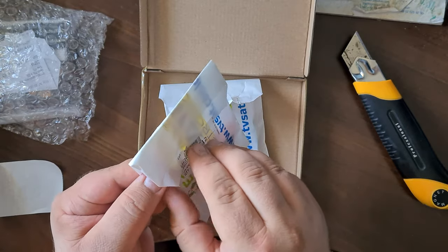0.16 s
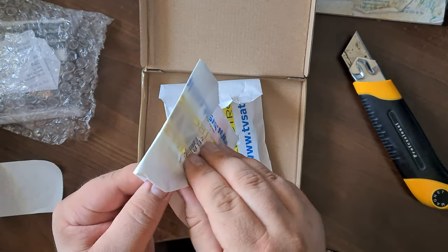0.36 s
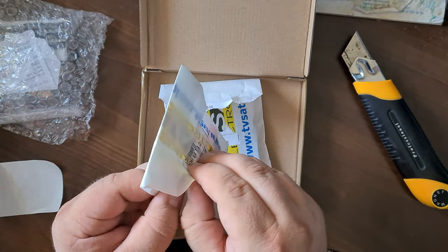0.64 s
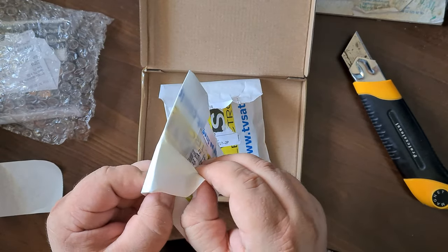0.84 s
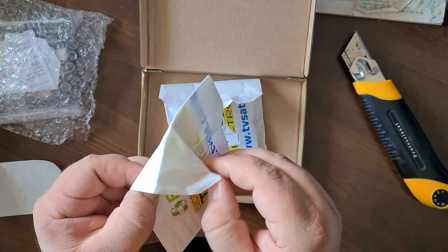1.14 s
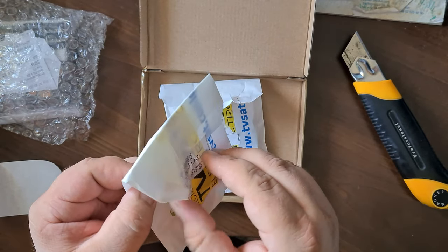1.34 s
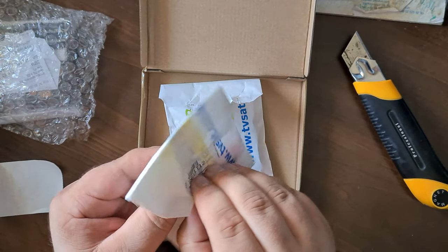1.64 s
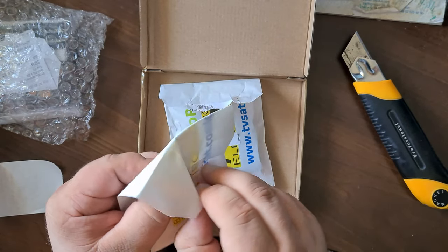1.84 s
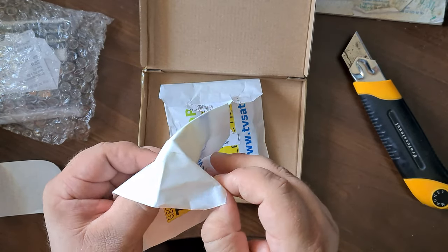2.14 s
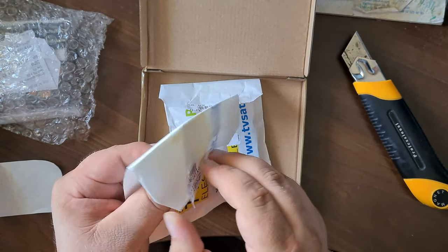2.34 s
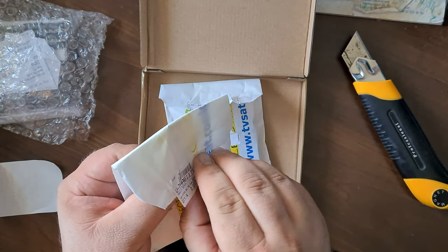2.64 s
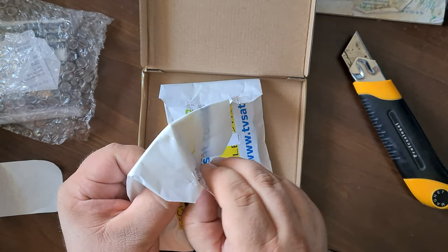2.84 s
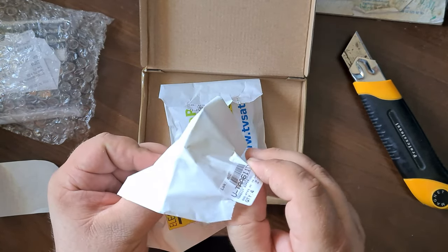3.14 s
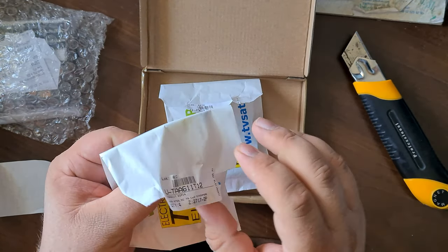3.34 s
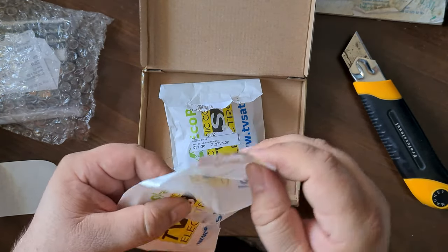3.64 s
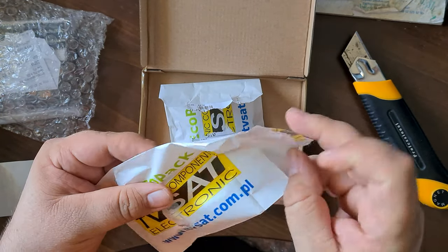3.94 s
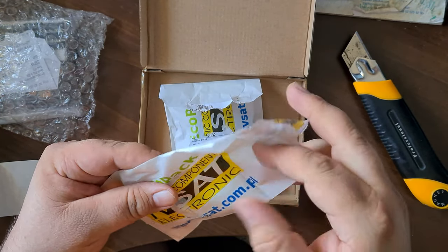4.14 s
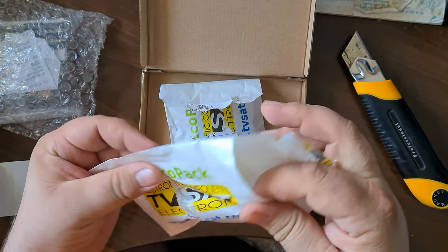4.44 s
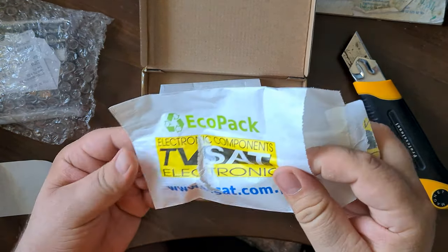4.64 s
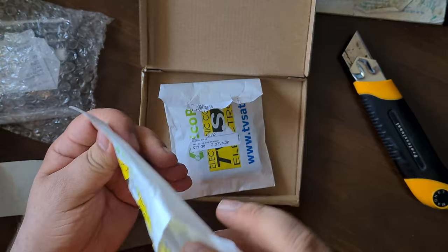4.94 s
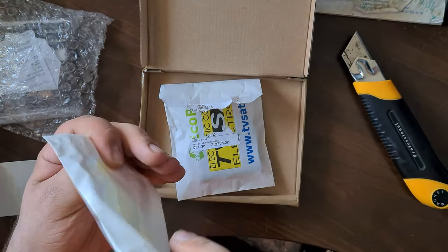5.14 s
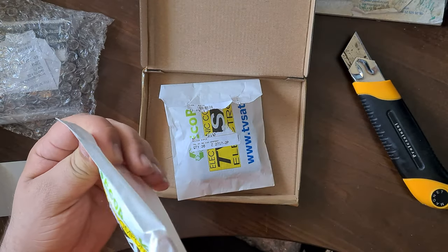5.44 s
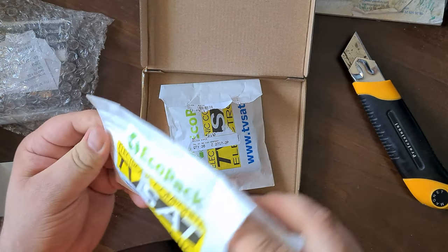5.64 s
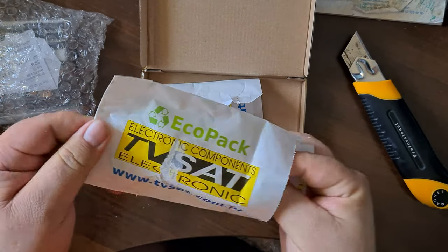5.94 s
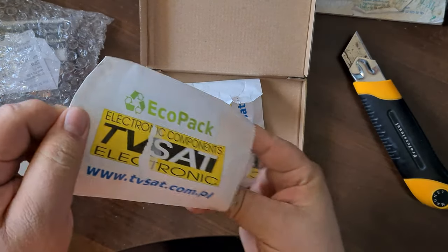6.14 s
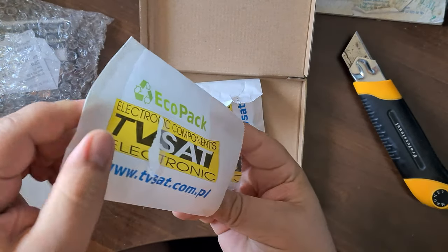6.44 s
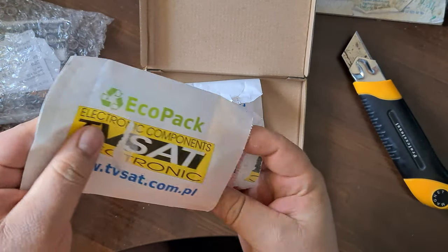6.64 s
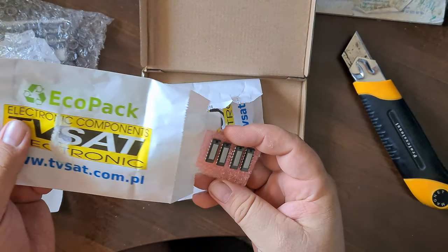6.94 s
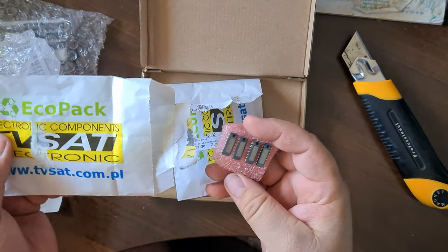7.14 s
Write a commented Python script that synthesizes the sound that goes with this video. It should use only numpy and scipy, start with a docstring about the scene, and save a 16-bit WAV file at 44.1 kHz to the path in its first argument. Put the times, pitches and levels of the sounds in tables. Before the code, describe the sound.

Close to the microphone in a quiet small room, hands work at a small stiff paper envelope over an open cardboard box. From 0 s come dry, irregular crackles and bright crease snaps, with a stronger snap at about 0.9 s running into a brief scrape. From 1 to 2.7 s the fingers rub and fold in uneven bursts, with another short scrape near 1.9 s. The rustle thickens, and at 3.0 s there is a sharp, quick double rip. Fuller crinkles follow, with dull panel pops at 3.9 and 4.35 s. Between 5.1 and 6.3 s the snaps are loudest and crispest, with a short tear at 5.2 s. A last scrape comes near 6.6 s, then the paper fades to sparse, faint ticks until about 7.2 s. Soft air noise, faint hum and swelling low rumble continue underneath.

```python
"""Opening a paper envelope over a box

Two hands work open a small paper envelope over a cardboard box on a desk, close to the microphone.
Creases buckle as dry volleys of noise with a ringing facet; sliding sheets crackle in tiny random slips.
Hard pulls rip in dense runs of slips, and panels pop over as dull puffs of low noise.
Box resonances and a short room tail colour the paper, over air noise, a faint hum and a low rumble."""
import sys
import numpy as np
from scipy import signal
from scipy.fft import rfft, irfft, next_fast_len
from scipy.io import wavfile
from scipy.ndimage import uniform_filter1d

SR = 44100
rng = np.random.default_rng(int(sys.argv[2]) if len(sys.argv) > 2 else 0)


def wav_out(sig):
    """Save sig, one row per channel (or a flat mono array), as 16-bit PCM at SR to the path in sys.argv[1]."""
    wavfile.write(sys.argv[1], SR, np.round(np.clip(np.atleast_2d(sig).T, -1, 1) * 32767).astype(np.int16))


N = 321489
TIME = np.arange(N) / SR

# Still air of the room. Each row: frequency in Hz, relative density in dB per Hz.
AIR_COLOUR = [(20, -32), (36, 0), (60, 2), (105, -0.5), (150, -4), (230, -6), (420, -1), (520, -7),
              (720, -2.5), (950, -9), (1300, -10), (2200, -16.5), (6000, -28), (16000, -43)]
# Steady hum of an appliance. Each row: frequency in Hz, level in dB before the left-right trim.
HUM_TONES = [(102.3, -68), (339.1, -64.5)]
# Low drones that come through the walls.
# Each row: centre in Hz, width in Hz, level in dB before the left-right trim.
LOW_DRONES = [(37, 11, -72.5), (60, 8, -77), (89, 59, -72)]
# The rumble swells and sinks. Each row: peak in seconds, rise in seconds, fall in seconds,
# centre in Hz, width in Hz, peak level in dB before the left-right trim.
RUMBLE_SWELLS = [(.1, .3, 0.59, 85, 35, -60.5), (1.12, 0.14, 0.12, 40, 22, -56),
                 (1.45, 0.7, 0.33, 85, 24, -59), (3.95, 0.75, .2, 60, 9.4, -58.5),
                 (4.1, .2, 0.47, 37, 11, -59), (5.25, 0.11, .2, 80, 24, -59),
                 (6.05, 0.22, 0.26, 37, 10, -62), (6.4, .15, 0.16, 84, 21, -59)]
# The fingers slide one sheet over another. Each row: start in seconds, length in seconds,
# level in dB before the crackle trim, body in dB, crispness in dB.
SLIDE_STROKES = [(0, 0.14, -36.5, 1, -7.5), (0.179, 0.092, -45, 1, -11), (0.329, 0.091, -43, -7, -6),
                 (.52, 0.042, -51, -8, -5), (0.583, 0.055, -43.5, -21, -5), (0.707, 0.3, -38, -10, -2.5),
                 (0.931, 0.091, -32.5, 7.5, -5), (1.067, 0.19, -42.5, -1, -5), (1.343, 0.042, -40, -1, -8),
                 (1.458, 0.069, -45.5, -5, -6.5), (1.605, 0.1, -50.5, -3, -4), (1.7, 0.14, -35.5, -5, -3.5),
                 (1.846, 0.077, -31.5, 1.5, -2), (1.97, 0.21, -39, 1, -8.5), (2.201, 0.054, -33, 0.5, -6),
                 (2.284, 0.37, -39.5, 2, -4.5), (2.691, 0.42, -31.5, -3, -4.5), (3.01, .06, -31, 0, -8),
                 (3.199, 0.015, -35, 6, -2), (3.304, 0.014, -34.5, 3.5, -4.5), (3.347, .06, -49, 6, -5),
                 (3.429, 0.3, -40.5, 6.5, -3.5), (3.688, 0.13, -32.5, 2.5, 0.5),
                 (3.907, 0.037, -36.5, 5.5, 3), (4.041, 0.082, -39, 3, -2.5), (4.187, .11, -42, 6.5, 5.5),
                 (4.316, 0.056, -29.5, 5, 0.5), (4.442, 0.03, -33.5, 2, -3.5),
                 (4.601, 0.024, -36.5, 7.5, -1.5), (4.704, 0.074, -36, 8, 1), (4.857, .15, -51, 8.5, -0.5),
                 (5.082, 0.036, -38.5, 3, -1.5), (5.151, 0.12, -27.5, 3, -1), (5.335, 0.11, -30, 3, -6),
                 (5.488, 0.073, -30.5, 0.5, -3.5), (5.655, 0.11, -37, 6, -3), (5.778, 0.11, -30, 1.5, -6.5),
                 (6.013, 0.079, -32, 2.5, -5), (6.229, 0.024, -32.5, 8, -2), (6.302, 0.022, -37.5, 2, -3),
                 (6.57, 0.042, -34, -3, -7), (6.666, 0.12, -41, 7.5, -4), (6.805, 0.27, -54, 11, -10)]
# A crease buckles. Each row: time in seconds, level in dB before panning, body in dB,
# crispness in dB, ring of the paper facet in Hz.
CREASE_SNAPS = [(.027, -33, -14, 1.5, 2035), (.0787, -32.5, 6, 6.5, 1900), (.1186, -31.5, -17, 1, 3300),
                (.1918, -31, 0.5, -4, 1930), (.2461, -34, 4, 0.5, 1890), (.3227, -45, 0, -1, 3160),
                (.3726, -37.5, -5, 0, 2090), (.4418, -43.5, -9, 7, 4690), (.6073, -31.5, -16, -5, 3420),
                (.6208, -47.5, -10, 17, 6350), (.6543, -34, -8, -2, 1940), (.7126, -32, -18, -8, 3230),
                (.8012, -30.5, -11, 4.5, 4940), (.8152, -35.5, -15, -14, 3540), (.8717, -19, -6, -3, 2820),
                (.938, -27.5, -18, 1, 1930), (1.0685, -29, 7, 9.5, 4700), (1.2115, -28.5, -6.5, 2.5, 4380),
                (1.3198, -33, -19, -9, 5960), (1.3857, -32.5, 2, 2, 1823), (1.4268, -38, -24, -9, 3380),
                (1.502, -36, 8, -1, 2846), (1.569, -39.5, -2, -1.5, 5360), (1.6517, -32.5, -11, -9, 3155),
                (1.7286, -27, 2, -1.5, 2970), (1.7916, -30.5, 3, -4, 3800), (1.8379, -31.5, 3, 6, 4960),
                (2.005, -28.5, -33, 0.5, 1970), (2.0471, -28.5, -7, -13, 1630),
                (2.2278, -28.5, 9, 3.5, 1970), (2.3583, -27, 3, 2.5, 5900), (2.4467, -31, 3, 7.5, 4700),
                (2.4626, -29, -3, -1, 6330), (2.5079, -31.5, -20, -1, 1970), (2.5814, -30.5, -15, 1, 3600),
                (2.6152, -27, -10, -1.5, 3360), (2.6941, -32, 1, -3, 1540), (2.742, -30.5, 3, 0, 1840),
                (2.8149, -31, 2.5, 2, 1846), (2.856, -27, 3, -5, 1780), (2.9373, -27, -2, -19, 2640),
                (3.0055, -27, -5, -19, 2040), (3.1883, -34.5, 10, 1, 2150), (3.2096, -36.5, -10, 4, 1880),
                (3.2312, -29.5, 2, -8.5, 1940), (3.2933, -34, 3, -3, 6000), (3.3834, -40.5, 8, 7, 3372),
                (3.4661, -36.5, 13, -12, 2130), (3.5074, -36, 10, 4, 1300), (3.6008, -28.5, -4, 6.5, 3030),
                (3.64, -29, 6.5, 5, 3260), (3.7624, -28, 7, 7, 4590), (3.807, -26, -19, -6, 3400),
                (3.9, -29.5, 13.5, 3.5, 1514), (4.0185, -37, -5, 4, 5040), (4.072, -31, -5, 3, 4040),
                (4.1406, -38, -5, -7, 4400), (4.1888, -29, 4, -7, 4530), (4.2167, -33.5, -8, -4, 1940),
                (4.3245, -28, 10.5, 10, 5716), (4.396, -29.5, 2, 1, 3380), (4.4597, -30, -20, 3, 6100),
                (4.4885, -26, 5, -10, 3280), (4.5965, -26, -6.5, -2.5, 6060), (4.62, -31, 3, -4, 3360),
                (4.7331, -34.5, 10, 11.5, 4230), (4.8563, -38, -20, 9.5, 5670), (4.904, -34, 6, -0.5, 3320),
                (4.9785, -39, -8, -1, 3320), (5.0966, -28.5, -6, -3, 4236), (5.1076, -25, 6.5, -2.5, 4400),
                (5.1517, -32, 1, 7, 1310), (5.165, -28, -8, 5, 1310), (5.2209, -27, 10.5, 7, 2000),
                (5.3816, -31, -1, 0.5, 4940), (5.4845, -28.5, -7, 0, 6360), (5.516, -22.5, 4.5, 0.5, 2862),
                (5.6011, -21.5, 0.5, -7, 2710), (5.813, -26, -15, -1, 2105),
                (5.9588, -22.5, 6.5, -15, 2600), (6.0026, -31.5, -13, -1, 2350),
                (6.0247, -23.5, -26, -6.5, 2940), (6.0563, -29, 7.5, 2, 1470),
                (6.175, -27.5, 10, -7.5, 2770), (6.2424, -24, -17.5, -2, 3913), (6.4395, -40.5, 4, 1, 2600),
                (6.5149, -32, 0, -2.5, 4050), (6.7513, -30.5, -5, 0.5, 4750), (6.851, -41.5, 5, -1, 6100),
                (7.016, -44, 0, -1, 5800), (7.0541, -45, -12, -14, 3430), (7.1168, -37, 5, 0, 1790)]
# A hard pull rips or scrapes the paper.
# Each row: start in seconds, end in seconds, level in dB, body in dB, crispness in dB.
HARD_PULLS = [(0.939, 1.005, -31.5, -1, -2), (1.864, 1.902, -29.5, 0.5, 2.5), (2.999, 3.058, -22, -7, -6),
              (3.043, 3.08, -19.5, 3, -1), (4.342, 4.362, -28.5, 4.5, 8), (5.223, 5.249, -23.5, 2, -4),
              (6.588, 6.623, -28, -1, -4.5)]
# A whole panel of the envelope pops over. Each row: time in seconds, peak level in dB before the box and room.
PANEL_FLOPS = [(1.028, -43), (3.061, -45), (3.9, -32), (4.35, -38), (5.225, -46), (6.025, -46)]
# Colour of a snap. Each row: frequency in Hz, relative density in dB per Hz.
SNAP_SPECTRUM = [(100, -43.5), (250, -15), (450, -14.5), (800, -10.5), (1300, -3), (2000, -4.5),
                 (2900, -0.5), (4200, -1), (6200, -1), (7500, -6), (8800, -11.5), (11000, -10.5),
                 (12400, -8), (16000, -12.5)]
# Colour of sliding and ripping paper. Each row: frequency in Hz, relative density in dB per Hz.
RUB_SPECTRUM = [(100, -27), (250, -21.5), (450, -11.5), (800, -7.5), (1300, -4), (2000, -3), (2900, -0.5),
                (4200, -2.5), (6200, -2.5), (7500, -6), (8800, -13), (11000, -12.5), (12400, -7),
                (16000, -14)]
# How much of the body each frequency takes. Each row: frequency in Hz, share from 0 to 1.
BODY_WEIGHT = [(850, 1), (1600, 0)]
# How much of the crispness each frequency takes. Each row: frequency in Hz, share from 0 to 1.
CRISP_WEIGHT = [(2700, 0), (5600, .55), (11000, 1)]
# Resonances of the pouch and the open box under it. Each row: centre in Hz, width in Hz, lift in dB.
HOLLOW_MODES = [(1308, 46, 8), (1894, 210, 5.5), (2067, 20, 8), (2880, 130, 1), (3183, 30, 5.5),
                (4020, 53, 2)]
# Decay of the room. Each row: frequency in Hz, time to fall 60 dB in seconds.
ROOM_DECAY = [(250, 0.45), (700, 0.32), (1800, 0.17), (4500, 0.36), (12000, 0.1)]
# Likeness of the two channels. Each row: frequency in Hz, likeness from 0 to 1.
CHANNEL_LIKENESS = [(100, 0.85), (550, 0.83), (1650, 0.66), (3000, 0.95), (5000, 0.45), (15000, 0.1)]
# Tonal balance between the channels. Each row: frequency in Hz, left minus right in dB.
LEFT_BALANCE = [(1000, 0), (4000, 1.8), (8000, -1.5), (12000, 3)]

# A stroke takes hold, lets go, and leaves the sheets creeping faintly.
GRIP_S, RELEASE_S, CREEP_DB, CREEP_S = 0.0042, 0.02, -8, 0.098
SLIP_S = .0009  # power decay of one tiny slip of the crackle
EDGE_HZ = 16050  # top of the recorder's band


def amp(db):
    """Decibels to gain."""
    return 10 ** (np.asarray(db) / 20)


def unit(x):
    """Scales to an rms of one."""
    return x / np.sqrt(np.mean(abs(x) ** 2) + 1e-20)


def read(points, hz):
    """Reads a table over log frequency."""
    f, value = np.transpose(points)
    return np.interp(np.log(hz + 1), np.log(f + 1), value)


def add(mix, s, sound):
    """Adds a stereo sound at time s."""
    part = mix[:, max(round(s * SR), 0):][:, :sound.shape[1]]
    part += sound[:, :part.shape[1]]


def causal(gain):
    """Gives a gain curve the phase of a thing that rings only after it is struck (minimum phase)."""
    log_gain = np.log(np.maximum(gain, 1e-5))
    circle = np.concatenate([log_gain, log_gain[..., -2:0:-1]], -1)
    return np.exp(np.conj(signal.hilbert(circle)))[..., :gain.shape[-1]]


def pair(a, b, hz, lead_s):
    """Blends two unrelated spectra into left and right, with the right ahead by lead_s."""
    same = np.clip(read(CHANNEL_LIKENESS, hz), 0, 1)
    balance = amp(read(LEFT_BALANCE, hz) / 2)
    shared, own = np.sqrt((1 + same) / 2), np.sqrt((1 - same) / 2)
    left = (shared * a + own * b) * balance * np.exp(-2j * np.pi * hz * lead_s)
    right = (shared * a - own * b) / balance
    return np.array([left, right])


def tilt_db(hz, body_db, crisp_db):
    """Large loose panels add body; tight small creases add treble."""
    return body_db * read(BODY_WEIGHT, hz) + crisp_db * read(CRISP_WEIGHT, hz)


def slip_power(length, per_s, spread_db, slip_s):
    """Power of a random train of fibre slips of unequal size, each dying away over slip_s; mean one."""
    sizes = amp(spread_db * np.minimum(rng.exponential(1, length), 4))
    slips = sizes * (rng.random(length) < per_s / SR)
    power = signal.lfilter([1], [1, -np.exp(-1 / (slip_s * SR))], slips ** 2)
    return power / (power.mean() + 1e-12)


def background(air_db=-56.0):
    """Room air as coloured noise, a steady hum of sine tones, and the low rumble."""
    hz = np.fft.rfftfreq(N, 1 / SR)
    noise = pair(*rfft(rng.standard_normal((2, N))), hz, 0)
    air = unit(irfft(noise * amp(read(AIR_COLOUR, hz)), N))
    hum = sum(amp(db) * np.sqrt(2) * np.sin(2 * np.pi * (f * TIME + rng.random())) for f, db in HUM_TONES)
    return amp(air_db) * air + hum + rumble()


def rumble():
    """Steady low drones, and swells that rise and sink as bells."""
    out = sum(amp(db) * drone(hz, width) for hz, width, db in LOW_DRONES)
    for s, rise_s, fall_s, hz, width, db in RUMBLE_SWELLS:
        bell = np.exp(-((TIME - s) / np.where(TIME < s, rise_s, fall_s)) ** 2)
        out = out + amp(db) * bell * drone(hz, width)
    return out


def drone(centre_hz, width_hz):
    """A narrow band of low noise, held at an even level of one."""
    size = next_fast_len(N)
    hz = np.fft.rfftfreq(size, 1 / SR)
    band_gain = 1 / (1 + (2 * (hz - centre_hz) / width_hz) ** 4)
    band = irfft(rfft(rng.standard_normal(size)) * band_gain, size)[:N]
    return band / np.sqrt(uniform_filter1d(band ** 2, size=12000))


def pull():
    """Level, body and crispness (dB) of the sliding paper over time; stronger strokes weigh more in the colour."""
    t = TIME[::40]  # hands move slowly enough for a coarse grid
    start, length, db, body_db, crisp_db = np.transpose(SLIDE_STROKES)[:, :, None]
    age = np.maximum(t - start, 0)
    after = np.maximum(age - length, 0)
    grip = 1 - np.exp(-age / GRIP_S)
    release = np.exp(-after / RELEASE_S) + amp(CREEP_DB) * np.exp(-after / CREEP_S)
    release = release / (1 + amp(CREEP_DB))
    power = (amp(db) * grip * release) ** 2
    total = power.sum(0) + 1e-9
    level = 10 * np.log10(total)
    body, crisp = (power * body_db).sum(0) / total, (power * crisp_db).sum(0) / total
    return [np.interp(TIME, t, curve) for curve in (level, body, crisp)]


def crackle(effort, level_db=-1, slips_per_s=700, spread_db=2.5, hiss_db=-11, patch_db=4.0,
            left_db=0.0, lead_s=.00007):
    """Fibres catch and let go in tiny slips of very unequal size, over the hiss of sheet on sheet."""
    db, body_db, crisp_db = effort
    power = slip_power(N, slips_per_s, spread_db, SLIP_S) + amp(hiss_db) ** 2
    power /= uniform_filter1d(power, size=1300)  # the pull of the hands sets the power that the slips share
    grains = rng.standard_normal((2, N)) * np.sqrt(power)

    padded = next_fast_len(N + 4096) * 2
    hz = np.fft.rfftfreq(padded, 1 / SR)
    colour = causal(unit(amp(read(RUB_SPECTRUM, hz))))
    grains = irfft(pair(*rfft(grains, padded), hz, lead_s) * colour)[:, :N]

    hz, t, z = signal.stft(grains, SR, nperseg=256, noverlap=192)
    # the facets keep changing shape, so their resonances come and go
    patches = uniform_filter1d(rng.standard_normal(z.shape[1:]), size=3, axis=0)
    patches = unit(uniform_filter1d(patches, size=12, axis=1))
    tilt = amp(tilt_db(hz[:, None], np.interp(t, TIME, body_db), np.interp(t, TIME, crisp_db)))
    z = z * tilt * unit(amp(patch_db * patches))
    grains = signal.istft(z, SR, nperseg=256, noverlap=192)[1][:, :N]
    return grains * amp(db + level_db + np.array([[left_db], [-left_db]]))


def snaps(rows, level_db=0, rise_s=.0004, volley_s=.0033, stretch=.12, settle_s=0.019, settle_db=-22,
          desk_s=0.007, desk_db=-18, desk_spread_s=0.0055, ring_s=0.0023, lead_s=.00007,
          left_db=-0.1, wander_db=2.0, size=2048):
    """Each buckle is a quick volley of fibre slips that rings one facet; the desk returns it and the sheet settles."""
    out, t, hz = np.zeros((2, N)), np.arange(size) / SR, np.fft.rfftfreq(size, 1 / SR)
    span = np.sqrt(.006 * SR)  # levels are rms over 6 ms
    for s, db, body_db, crisp_db, ring_hz in rows:
        # where on the envelope the crease lies: scales the desk delay and the lead of the right
        height, side = rng.uniform(1.0, 1.9), rng.uniform(0.14, 1.53)
        pan_db = left_db + wander_db * rng.uniform(-1, 1)

        burst_s = volley_s * amp(stretch * body_db)  # a larger panel takes longer to give
        onset = 1 - np.exp(-t / rise_s)
        settle = amp(settle_db) * np.exp(-t / settle_s)
        volley = onset * (np.exp(-t / max(burst_s, rise_s)) + settle)
        volley += amp(desk_db) * np.exp(-abs(t - desk_s * height) / desk_spread_s)
        slips = rng.standard_normal((2, size)) * np.sqrt(rng.exponential(1, size)) * volley
        # the crease gives with one marked slip at the peak
        slips[:, np.argmax(volley)] = amp(-9) * np.linalg.norm(volley) * rng.choice([-1, 1], 2)

        z = pair(*rfft(slips), hz, lead_s * side)
        # a slip is broadband: flatten its broad shape and keep only the fine ripple
        broad = np.sqrt(uniform_filter1d(abs(z) ** 2, size=120, axis=1).mean(0))
        colour = unit(amp(read(SNAP_SPECTRUM, hz))) * amp(tilt_db(hz, body_db, crisp_db))
        crack = irfft(z * causal(colour / broad))

        # the facet swings for a few cycles; duller snaps ring more
        swing = np.sin(2 * np.pi * ring_hz * (t - np.array([[lead_s * side], [0]])))
        ring = unit(swing * onset * np.exp(-t / ring_s)) / np.sqrt(size)
        ring_gain = amp(-8 - .5 * crisp_db)
        sound = (crack + ring_gain * ring) / np.hypot(1, ring_gain)
        channel_db = db + level_db + np.array([[pan_db], [-pan_db]]) / 2
        add(out, s - rise_s, sound * span * amp(channel_db))
    return out


def small_snaps(effort, per_s=22, over_db=-1, spread_db=3.5, crisp_db=4, crisp_spread_db=4.5,
                low_hz=1700, high_hz=5000, least_db=-51, most_db=-33.5):
    """Lesser creases give at random, following the pull of the hands: rows like those of CREASE_SNAPS."""
    handled_s = max(start + length for start, length, *_ in SLIDE_STROKES)
    count = round(per_s * handled_s)
    when, facet = rng.random((count, 2)).T
    when = when * handled_s
    strength, tightness = rng.standard_normal((count, 2)).T
    db, body, crisp = (np.interp(when, TIME, curve) for curve in effort)
    level = np.clip(db + over_db + spread_db * strength, least_db, most_db)
    crispness = crisp + crisp_db + crisp_spread_db * tightness
    ring_hz = low_hz * (high_hz / low_hz) ** facet
    return list(zip(when, level, body, crispness, ring_hz))


def rips(level_db=0, slip_s=0.00045, rise_s=0.0011, stop_s=0.004, lead_s=.00007, size=8192):
    """Fibres give way in a dense, even run that starts sharply and stops when the paper comes free."""
    out, t, hz = np.zeros((2, N)), np.arange(size) / SR, np.fft.rfftfreq(size, 1 / SR)
    for start, end, db, body_db, crisp_db in HARD_PULLS:
        stop = np.exp(-np.maximum(t - (end - start), 0) / stop_s)
        envelope = (1 - np.exp(-t / rise_s)) * stop
        power = slip_power(size, 4500, 1.5, slip_s)  # slips per second, spread in dB
        run = rng.standard_normal((2, size)) * np.sqrt(power) * envelope
        colour = unit(amp(read(RUB_SPECTRUM, hz))) * amp(tilt_db(hz, body_db, crisp_db))
        rip = irfft(pair(*rfft(run), hz, lead_s) * causal(colour))
        add(out, start, amp(db + level_db) * rip)
    return out


def flops(low_hz=220, high_hz=560, decay_s=0.0023, size=4096):
    """A panel that pops over pushes a short, dull puff of air: decaying noise through a low band."""
    out, t = np.zeros((2, N)), np.arange(size) / SR
    band = signal.butter(2, [low_hz, high_hz], "band", fs=SR, output="sos")
    for s, db in PANEL_FLOPS:
        puff = signal.sosfilt(band, rng.standard_normal(size) * np.exp(-t / decay_s))
        add(out, s, amp(db) * np.array([puff, puff]) / abs(puff).max())
    return out


def surroundings(x, room_db=-14, build_s=0.0039, size=16384):
    """The pouch and box resonate, and the room adds a short tail of sparse random echoes."""
    t, hz = np.arange(size) / SR, np.fft.rfftfreq(size, 1 / SR)
    taps = rng.standard_normal((2, size)) * (rng.random((2, size)) < 4000 / SR)  # 4000 echoes per second
    f, age, z = signal.stft(taps, SR, nperseg=256)
    decay = amp(-60 * age / read(ROOM_DECAY, f)[:, None])
    tail = signal.istft(z * decay, SR, nperseg=256)[1][:, :size]
    build = 1 - np.exp(-(t / build_s) ** 2)
    tail = amp(room_db) * unit(tail * build) / np.sqrt(size)
    lift_db = sum(db / (1 + (2 * (hz - centre) / width) ** 2) for centre, width, db in HOLLOW_MODES)
    response = irfft((1 + pair(*rfft(tail), hz, 0)) * causal(amp(lift_db)))  # 1 is the direct sound
    return signal.fftconvolve(x, response, axes=1)[:, :N]


def scene():
    """The envelope in its room."""
    effort = pull()
    still = background() * amp([[.6], [-.6]])  # left-right trim in dB
    paper = crackle(effort) + snaps(CREASE_SNAPS) + snaps(small_snaps(effort)) + rips() + flops()
    return surroundings(paper) * amp(1) + still


def record(dry):
    """The band limit of the recorder: a steep low-pass filter."""
    low_pass = signal.firwin(401, EDGE_HZ, window=("kaiser", 8), fs=SR)
    return signal.oaconvolve(dry, low_pass[None], "same")


dry = scene()
out = record(dry)
wav_out(out)
```